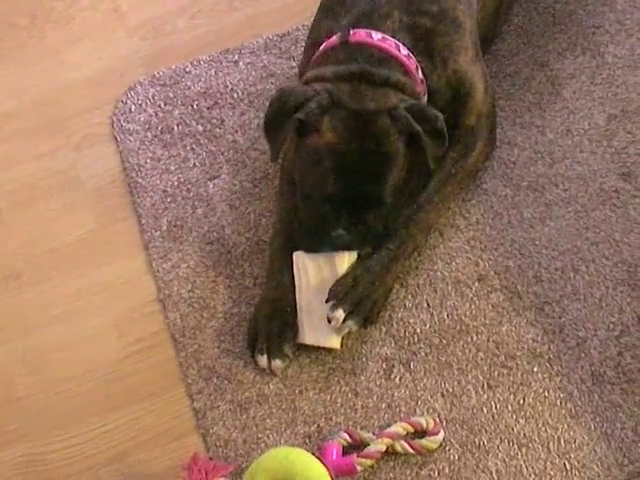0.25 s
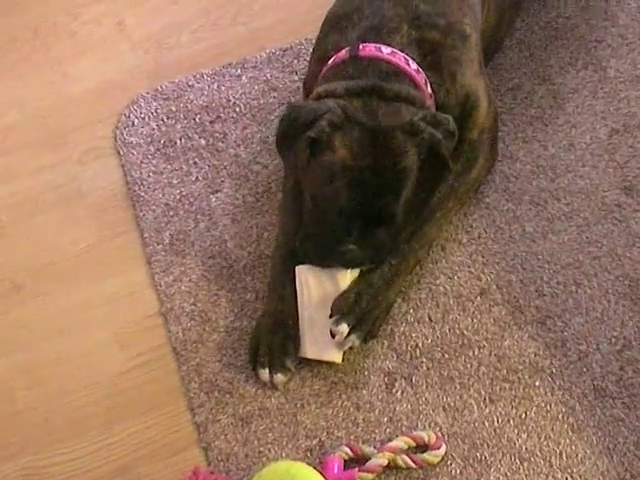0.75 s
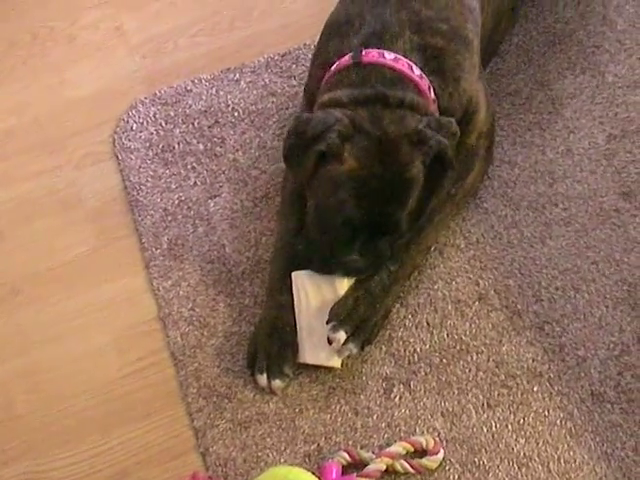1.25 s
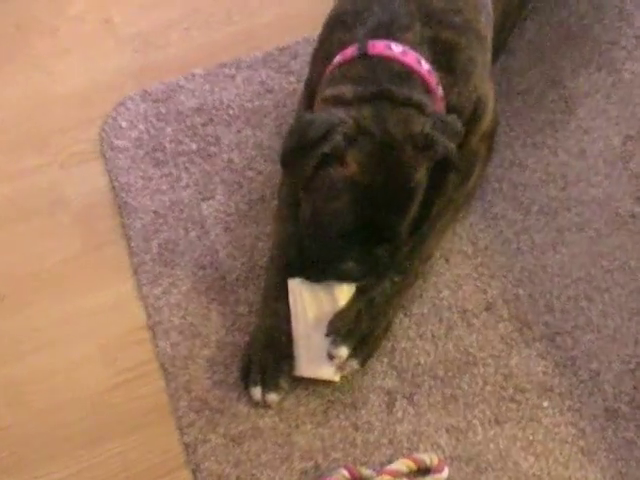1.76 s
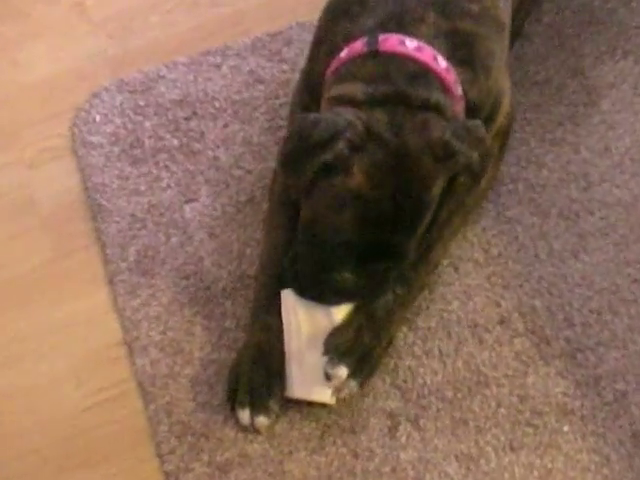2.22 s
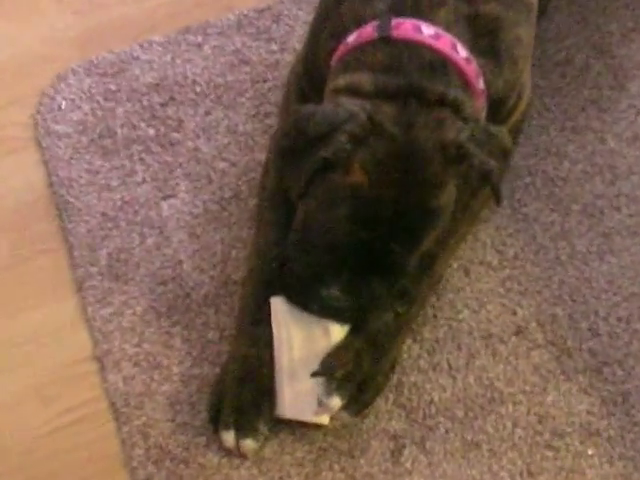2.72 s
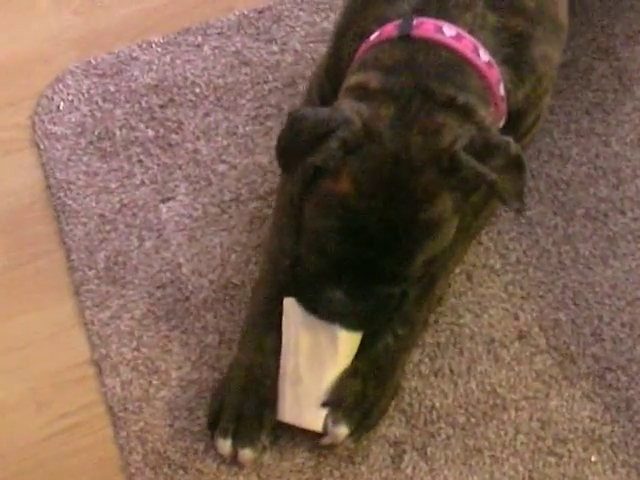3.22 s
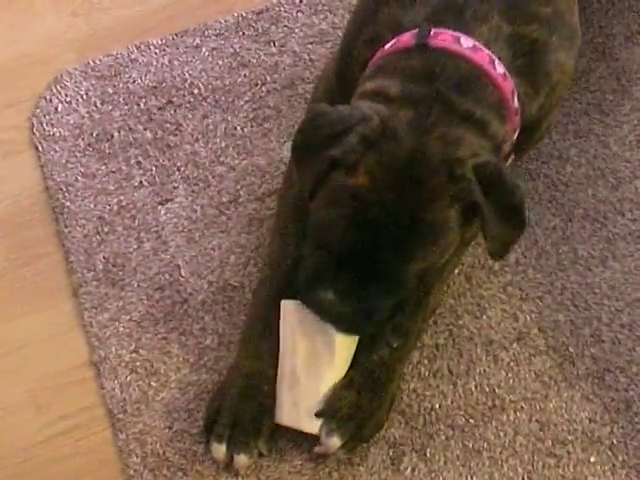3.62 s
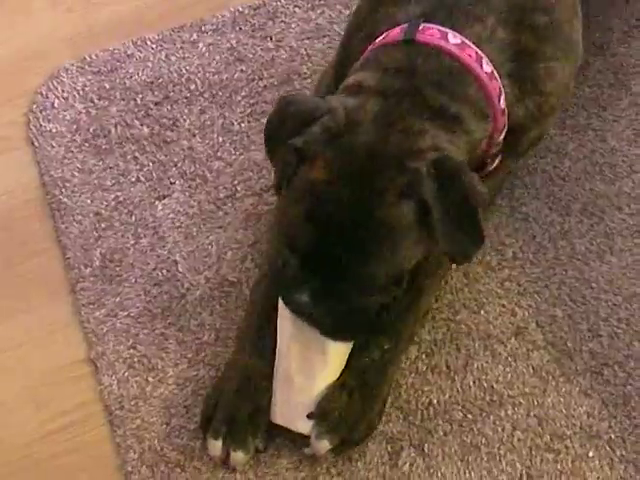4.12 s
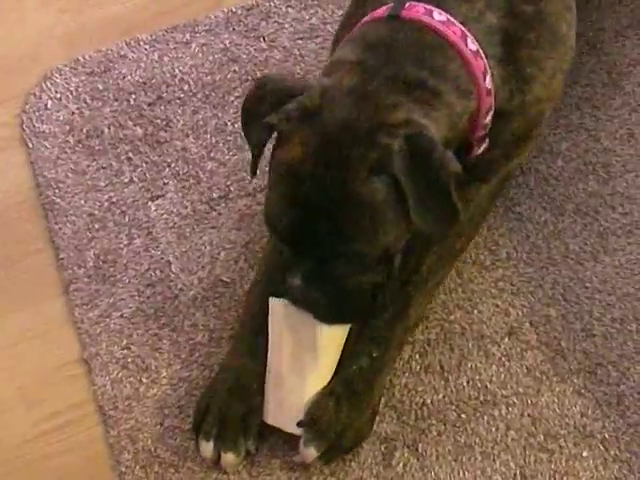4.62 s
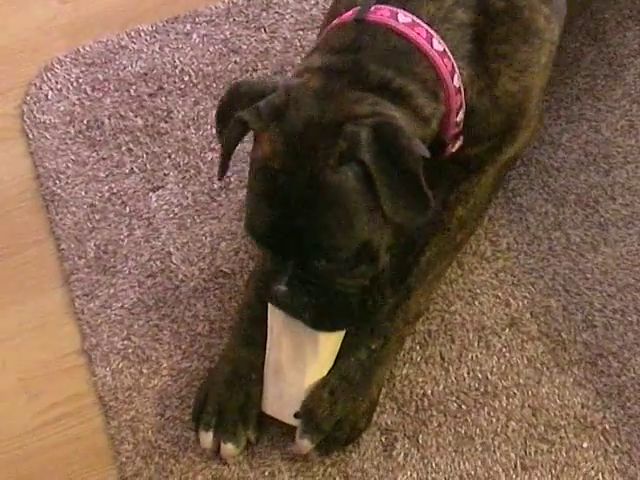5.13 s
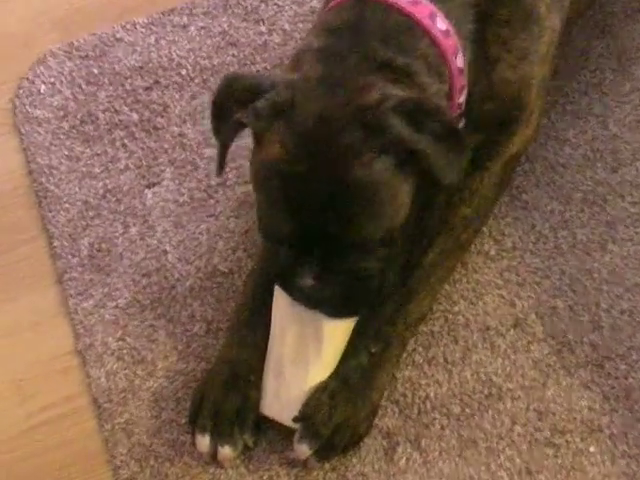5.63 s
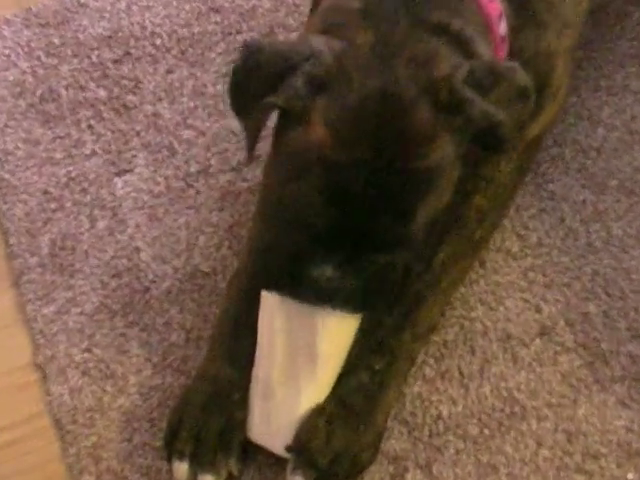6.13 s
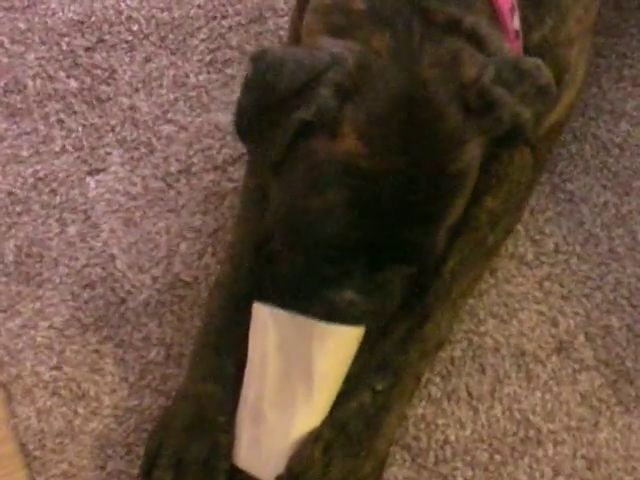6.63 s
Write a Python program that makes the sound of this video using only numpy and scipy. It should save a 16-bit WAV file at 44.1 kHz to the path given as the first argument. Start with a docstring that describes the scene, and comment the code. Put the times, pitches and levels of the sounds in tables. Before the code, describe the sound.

Indoors, teeth click and crack sharply on a hard chew with wet rasping and soft thumps, above steady low room rumble and hum.

```python
"""Dog gnawing a hollow chew

In a living room a dog lies on a rug with a hard chew held between its paws, before a small
hand-held stereo microphone. Bites and knocks ring modes of chew and teeth; thuds are beating
low tones from the floor; the tongue is flickering noise bands. Dense reflections and crackling
noise tails place the blows in the room; an appliance hums over coloured noise and rumble."""
import sys
import numpy as np
from scipy import signal
from scipy.fft import rfft, irfft
from scipy.io import wavfile
from scipy.ndimage import uniform_filter1d

SR = 44100
rng = np.random.default_rng(int(sys.argv[2]) if len(sys.argv) > 2 else 0)


def to_wav(sig):
    """Store sig (one row per channel, or 1-D mono) as 16-bit WAV at the path in sys.argv[1].

    Samples outside -1..1 are clipped; the rate is SR.
    """
    pcm = np.clip(np.atleast_2d(sig), -1, 1) * 32767
    pcm = np.round(pcm).astype(np.int16)
    wavfile.write(sys.argv[1], SR, pcm.T)  # frames by channels


def volts_from_decibels(level):
    """Turn decibel levels (scalar or array-like) into linear amplitude factors."""
    exponent = np.asarray(level, float) / 20
    return 10 ** exponent


N = 302526

# room tone spectrum: (frequency [Hz], relative density [dB per Hz])
ROOM_TONE_COLOUR = [(15, -53), (25, -43), (48, -22.5), (86, -5), (146, -4.5), (194, 2), (284, 0),
                    (360, -22), (415, -13), (527, -17.5), (789, -14.5), (1240, -18), (5560, -28),
                    (6730, -31), (7400, -36.5), (9620, -71), (16300, -120)]
# appliance lines: (frequency [Hz], mean level [dB rms], frequency wander [Hz])
HUM_LINES = [(99, -57.5, 0.55), (192, -78, 8.5), (292.3, -65.5, 8.6), (410.3, -67, 4.32)]
# likeness of the two microphone sides in noise: (frequency [Hz], likeness [-1 to 1])
MICROPHONE_LIKENESS = [(60, 0.19), (180, 0.12), (530, -0.18), (1580, -0.49), (4710, -0.56), (14000, -0.15)]
# reflections of the living room: (frequency [Hz], t60 [s], relative level [dB])
ROOM_DECAY = [(147, 0.35, 3), (485, 0.47, 5), (830, 0.41, -1.5), (1480, 0.28, 2), (3000, 0.15, -2.5),
              (5930, 0.64, -13.5), (11000, 0.2, -3)]
# crackling noise tails of the cracks, dying away in the room:
# (time [s], level at the crack [dB], centre [Hz], width [Hz], t60 [s])
CRACK_TAILS = [(1.353, -58, 2500, 1500, .2), (1.6437, -51, 3280, 1500, .12), (1.952, -61, 5300, 2000, 0.14),
               (2.41, -48, 3000, 600, 0.44), (2.409, -51, 5000, 700, 0.36),
               (2.5754, -47.5, 3000, 1610, 0.26), (2.8543, -48.5, 3050, 400, 0.69),
               (2.853, -53, 4570, 2510, 0.39), (3.3291, -55, 3450, 400, .3),
               (3.6821, -46.5, 3000, 900, 0.41), (3.682, -40.5, 5170, 1990, 0.33),
               (3.8645, -30, 3010, 650, 0.45), (3.8656, -40.5, 5300, 2200, 0.23),
               (3.8663, -35.5, 1380, 297, 0.36), (4.0761, -45, 3000, 1510, 0.44),
               (4.362, -56, 2730, 900, .4), (4.4394, -51, 3140, 900, 0.24),
               (4.6957, -48.5, 3300, 1200, 0.34), (4.936, -41, 3310, 350, 0.4),
               (4.936, -41, 5370, 900, 0.33), (4.936, -47, 3970, 600, 0.33), (5.3938, -46, 3460, 503, 0.43),
               (5.395, -42, 5400, 1600, 0.33), (5.3935, -47, 2000, 1200, 0.32),
               (4.522, -51, 2600, 1600, 0.18), (4.938, -47, 2000, 1400, 0.36)]
# treble hiss spectrum: (frequency [Hz], relative density [dB per Hz])
HISS_COLOUR = [(8300, -10), (8800, -1.5), (10000, 3), (12000, -3.5), (13200, -10.5), (14000, -40)]
# steady treble hiss before flicker: (time [s], level [dB])
STEADY_HISS = [(0.25, -70), (0.45, -89.5), (1.08, -70), (1.48, -79.5), (1.62, -65), (2.1, -70.5),
               (2.38, -78), (2.55, -75), (3.1, -72.5), (3.4, -65.5), (4.15, -70.5), (4.8, -71.5),
               (5.6, -67), (5.93, -68), (6.25, -66.5), (6.86, -70)]
# short puffs of treble hiss, perhaps licks: (time [s], peak [dB], slope to either side [dB/s])
HISS_PUFFS = [(0.07, -64, 158), (0.381, -69.5, 195), (0.554, -60.5, 292), (0.709, -65, 448),
              (0.78, -88, 301), (0.88, -78, 500), (1.3, -75, 250), (1.73, -67, 300), (2.23, -53, 800),
              (2.33, -73, 400), (2.59, -62.5, 400), (2.73, -70.5, 204), (2.98, -62, 248), (4.3, -59, 340),
              (4.53, -65, 254), (4.7, -62, 250), (4.87, -64, 404), (4.99, -63, 300), (6.31, -60, 150),
              (6.57, -61.5, 250), (6.67, -61, 196)]
# steady wet rasp before flicker: (time [s], level [dB], centre [Hz], reach [octaves])
TONGUE_RASP = [(0.1, -55.5, 3400, 0.71), (0.45, -75, 2800, .4), (0.54, -63.5, 4000, 0.69),
               (0.75, -65, 2940, 0.31), (1.08, -56.5, 3270, 0.87), (1.45, -67.5, 2820, 0.41),
               (1.87, -57.5, 3650, 0.98), (2.15, -63.5, 3200, 0.93), (2.6, -66, 3200, 0.5),
               (3.02, -55, 2740, 1.0), (3.25, -57.5, 3180, 1), (3.58, -57, 3080, 1), (3.8, -58, 3000, 0.98),
               (4.13, -53.5, 2850, 0.62), (4.33, -61, 2930, 1), (4.52, -52.5, 2640, 1),
               (4.58, -59.5, 2770, 0.8), (5.27, -59.5, 3360, 1), (5.6, -59.5, 3320, 0.57),
               (5.88, -58, 3000, 0.95), (6.0, -54.5, 3620, 0.55), (6.12, -58.5, 3550, 0.52),
               (6.2, -54.5, 3400, 0.99), (6.3, -56.5, 3700, 1), (6.35, -51, 3740, 0.29),
               (6.45, -56.5, 4100, 0.37), (6.58, -59.5, 3000, 0.93), (6.86, -56.5, 3250, 1)]
# chew pushed against the floor: (time [s], relative level [dB], lower pitch [Hz], t60 [s])
FLOOR_THUDS = [(0.032, -41, 235, 0.029), (0.253, -41.5, 183, 0.12), (0.677, -35, 175, 0.049),
               (0.736, -38.5, 173, 0.19), (0.795, -39, 170, 0.055), (0.875, -41, 157, 0.055),
               (1.252, -38.5, 164.3, 0.29), (1.354, -26.5, 172, 0.046), (1.408, -37.5, 193, 0.063),
               (1.385, -37, 173, 0.035), (1.462, -35.5, 187, 0.04), (1.485, -41.5, 197, 0.1),
               (1.952, -34.5, 183, 0.043), (2.087, -39.5, 212, 0.046), (2.219, -43, 218, 0.061),
               (2.236, -26.5, 188, 0.04), (2.376, -33.5, 174, 0.095), (2.489, -33, 186, 0.035),
               (2.576, -36.5, 175, 0.067), (2.597, -27.5, 176.5, 0.095), (2.791, -26, 188, 0.035),
               (2.813, -30.5, 178, 0.15), (2.852, -23.5, 168.3, 0.28), (3.089, -39, 175, 0.15),
               (3.15, -26.5, 167, 0.099), (3.212, -37.5, 214, 0.13), (3.303, -34.5, 162, 0.033),
               (3.683, -22.5, 242, 0.04), (3.708, -25, 173, 0.044), (3.74, -24, 192, 0.052),
               (3.773, -39, 266, 0.11), (3.793, -30.5, 176, 0.046), (3.869, -26.5, 177, 0.058),
               (3.901, -27.5, 238, 0.064), (4.082, -26.5, 173, 0.11), (4.326, -33, 196, 0.036),
               (4.37, -34, 199, 0.062), (4.39, -37, 200, 0.045), (4.418, -30.5, 184, 0.049),
               (4.445, -25, 192, 0.052), (4.472, -35.5, 202, 0.085), (4.505, -33, 179, 0.06),
               (4.535, -37, 199, 0.087), (4.689, -38.5, 158, 0.029), (4.751, -25, 185, 0.045),
               (4.869, -47, 210, 0.066), (4.938, -27, 195, 0.042), (4.956, -37, 171, 0.06),
               (4.98, -26.5, 179, 0.09), (5.25, -41, 245, 0.019), (5.376, -30.5, 226, 0.091),
               (5.395, -24, 216.7, 0.05), (5.429, -28.5, 192, 0.036), (5.453, -32, 222, 0.093),
               (5.61, -40, 181, 0.074), (5.915, -30.5, 192, 0.026), (5.947, -34, 192, 0.098),
               (6.041, -45, 192, 0.13), (6.08, -39, 200, 0.061), (6.316, -35, 188, 0.019),
               (6.469, -45, 284, 0.096), (6.566, -46, 266, 0.13)]
# jaws knocking the hollow of the chew; the grip picks the modes:
# (time [s], relative level [dB], centre [Hz], reach [octaves], left over right [dB])
JAW_KNOCKS = [(0.1, -45, 805, 0.24, -1), (0.674, -47, 780, 0.26, 1), (0.872, -44.5, 930, 0.28, -1),
              (0.958, -40.5, 925, 0.19, -2), (0.98, -39, 880, 0.24, -2), (1.079, -46, 980, 0.24, -2),
              (1.251, -50, 750, 0.26, -2), (1.351, -45.5, 676, 0.65, -1), (1.388, -48, 960, 0.24, -4),
              (1.408, -47, 890, 0.3, -9), (1.432, -57, 890, 0.31, -2), (1.468, -59, 835, 0.18, -2),
              (1.605, -45, 830, 0.3, -17), (1.695, -54, 770, 0.15, -5), (1.954, -33.5, 810, 0.15, -3),
              (2.057, -44.5, 716, 0.31, -12), (2.23, -43, 1030, 0.3, -2), (2.31, -45, 1010, 0.16, -7),
              (2.408, -42.5, 795, 0.14, -9), (2.488, -45.5, 750, 0.33, -7), (2.565, -39, 705, 0.45, -2),
              (2.596, -32.5, 690, 0.31, -1), (2.657, -54, 744, 0.32, -2), (2.788, -30.5, 700, 0.46, -1),
              (2.851, -20.5, 403, 0.73, -1.5), (2.878, -40, 555, 0.95, -1), (2.912, -48, 704, 0.8, -4),
              (2.972, -46, 657, 0.6, -2), (3.077, -50, 1200, 0.28, -8), (3.087, -40, 704, 0.46, 1),
              (3.138, -34.5, 590, 0.57, -2), (3.152, -33, 610, 0.55, -1), (3.222, -48, 662, 0.43, 1),
              (3.581, -49, 860, 0.17, -24), (3.648, -49, 840, 0.44, -8), (3.681, -30, 590, 0.63, -2),
              (3.704, -29.5, 624, 0.26, -8), (3.738, -44.5, 800, 0.38, -16), (3.758, -37, 670, 0.16, -20),
              (3.865, -16, 553, 0.78, -1.5), (3.886, -33, 650, 0.62, 2), (3.906, -46, 600, 0.46, 7),
              (3.927, -28.5, 770, 0.12, -8), (4.075, -28.5, 770, 0.43, -4), (3.958, -45, 1000, 0.35, -14),
              (4.28, -46, 865, 0.19, -18), (4.331, -43, 640, 0.42, -8), (4.361, -24.5, 542, 0.41, -1),
              (4.477, -44, 620, 0.94, -1), (4.695, -36.5, 1834, 0.091, -1), (4.751, -48, 820, 0.2, 1),
              (4.936, -33.5, 700, 0.69, 1), (4.96, -36, 620, 0.34, -6), (5.152, -46.5, 826, 0.42, -15),
              (5.242, -50, 880, 0.33, -20), (5.378, -36, 603, 0.42, -1), (5.393, -47, 1400, 0.52, -1),
              (5.397, -28.5, 594, 0.56, -3), (5.456, -42.5, 745, 0.17, -16), (5.535, -49, 630, 0.21, -11),
              (5.625, -53, 1600, 1, -11), (5.701, -47.5, 755, 0.13, -15), (5.901, -46, 493, 0.59, -12),
              (5.925, -35.5, 490, 0.18, 0), (5.965, -35, 485, 0.29, -6), (6.101, -49.5, 870, 0.12, -19),
              (6.502, -40, 470, 0.43, -5), (6.778, -43.5, 1220, 0.16, -2), (6.843, -44.5, 830, 0.48, -14)]
# modes of the chew's hollow: (frequency [Hz], relative level [dB], t60 [s])
HOLLOW_MODES = [(316, 1.5, 0.043), (480.4, 0, 0.057), (662, -2, 0.12), (732, -1.5, 0.043),
                (790.5, 10, 0.028), (885, 4.5, 0.029), (967, 4.5, 0.037), (1208, 15, 0.0074),
                (1402, 16.5, 0.015), (1680, 22.5, 0.0046)]
# teeth cracking on the chew's wall, levels relative to the modes:
# (time [s], wall level [dB], wall pitch [Hz], tooth tick level [dB], sizzle level [dB])
TOOTH_BITES = [(0.0603, -44, 4400, -61, -61), (0.4195, -39.5, 2830, -72, -59.5),
               (0.6862, -56, 1960, -46, -54), (0.8718, -34.5, 3230, -55, -68),
               (1.0095, -42.5, 2770, -55, -78), (1.052, -48, 3530, -45, -59), (1.3541, -53, 2300, -54, -68),
               (1.433, -61, 1980, -62, -80), (1.6007, -41, 2780, -53, -78), (1.616, -39, 3130, -60, -80),
               (1.6444, -28, 3240, -46, -50), (1.952, -41, 3900, -38, -43.5), (2.0586, -60, 2380, -47, -83),
               (2.2302, -35, 3170, -46, -46.5), (2.41, -30, 2930, -33.5, -37), (2.488, -44, 3000, -52, -73),
               (2.5747, -43, 3200, -43, -66), (2.595, -56.5, 2400, -39, -60), (2.755, -52, 4200, -60, -80),
               (2.788, -46, 3280, -61, -82), (2.807, -51, 4100, -62, -80), (2.8523, -25, 3150, -37, -51),
               (2.865, -29, 3100, -57, -70), (2.9975, -37.5, 2800, -41, -51),
               (3.0873, -48, 2730, -65, -87.5), (3.1467, -38.5, 2830, -71, -90),
               (3.2242, -40.5, 2900, -50.5, -83), (3.3288, -41, 3350, -52, -53),
               (3.6823, -25, 2950, -24, -35.5), (3.7136, -31, 3200, -54, -53), (3.754, -40, 2870, -51, -53),
               (3.8651, -5, 3000, -27, -32.5), (3.955, -40, 3000, -65, -68), (4.076, -29, 2850, -45, -44.5),
               (4.2872, -40, 3160, -51.5, -48), (4.3244, -44, 2740, -70, -67),
               (4.362, -27.5, 3060, -50, -49.5), (4.441, -29.5, 3200, -55, -67),
               (4.418, -44, 3300, -58, -73), (4.523, -44, 2730, -50, -61),
               (4.6957, -32.5, 3330, -49, -50.5), (4.937, -19.5, 3220, -26.5, -43.5),
               (4.952, -43, 3340, -43, -48), (4.9775, -28, 3160, -54, -45), (5.374, -45, 2730, -62, -72),
               (5.386, -42, 2680, -56, -66), (5.3937, -24.5, 3280, -25.5, -31.5),
               (5.441, -41, 3270, -60, -75), (5.454, -42, 3500, -62, -75), (5.583, -49, 2830, -67, -80),
               (5.6265, -37.5, 2900, -48.5, -80), (5.8715, -53, 2020, -52, -71),
               (5.912, -36.5, 2900, -46, -85), (5.983, -42, 3000, -59, -83), (6.158, -38, 3030, -61, -75),
               (6.171, -47, 4270, -53, -63), (6.285, -44, 3600, -59, -75), (6.3131, -49, 2420, -53, -51),
               (6.3315, -42, 3700, -63, -55), (6.6595, -34, 3220, -45.5, -59),
               (6.725, -41.5, 3420, -53, -66), (6.818, -35.5, 3250, -66, -64)]
# modes of the chew's wall: (frequency [Hz], relative level [dB], t60 [s])
WALL_MODES = [(1820, -18, 0.008), (2260, 27, 0.0014), (2506, 1.5, 0.019), (2897, 10, 0.0032),
              (3132, 4, 0.0069), (3439, 8, 0.0063), (3700, 4.5, 0.0076), (3950, 1, 0.018)]
# modes of the tooth tick: (frequency [Hz], relative level [dB], t60 [s])
TICK_MODES = [(5010, -17.5, 0.046), (5400, 2, 0.0045), (5757, -4, 0.0051), (6810, -17.5, 0.018)]
# modes of the tooth sizzle: (frequency [Hz], relative level [dB], t60 [s])
SIZZLE_MODES = [(9100, 2.5, 0.0028), (9760, -8.5, 0.011), (10900, 7, 0.0023), (11960, -5.5, 0.0014)]
# level under which faint treble drops out: (frequency [Hz], threshold [dB per Hz])
TREBLE_THRESHOLD = [(5500, -130), (6500, -108), (7200, -103), (7800, -104), (9000, -107), (11000, -107),
                    (13500, -106)]


def rms_one(x):
    """Scale to rms 1."""
    return x / np.sqrt(np.mean(x ** 2) + 1e-20)


def at_hz(points, hz, column=1):
    """Read a table on a log-frequency axis."""
    return np.interp(np.log(hz), np.log(np.array(points)[:, 0]), np.array(points)[:, column])


def drift(rate):
    """Slow chance with spread 1: noise through a low-pass at rate [Hz], drawn every 40 samples."""
    r = np.exp(-80 * np.pi * rate / SR)
    white = rng.standard_normal(N // 40 + 2002)
    slow = signal.lfilter([1], [1, -2 * r, r * r], white)[2000:]
    return np.interp(np.arange(N) / 40, np.arange(len(slow)), rms_one(slow))


def bandpass(x, low, high):
    """Keep the band between two frequencies [Hz]."""
    return signal.sosfilt(signal.butter(2, [low, high], "band", fs=SR, output="sos"), x)


def pair(mid, side, alike):
    """Left and right from two independent signals, alike from -1 to 1."""
    common, opposed = np.sqrt(1 + alike) * mid, np.sqrt(1 - alike) * side
    return np.array([common + opposed, common - opposed]) / np.sqrt(2)


def coloured_noise(spectrum):
    """Stereo noise with the given spectrum and the likeness of the microphone sides; rms 1."""
    hz = np.maximum(np.fft.rfftfreq(N, 1 / SR), 1)
    inside = (hz > spectrum[0][0]) & (hz < spectrum[-1][0])
    mid, side = rfft(rng.standard_normal((2, N))) * volts_from_decibels(at_hz(spectrum, hz)) * inside
    return rms_one(irfft(pair(mid, side, at_hz(MICROPHONE_LIKENESS, hz)), N))


def scattered(count, mean, spread):
    """Rows (time [s], values..) at random moments, values drawn about their means."""
    s = rng.random(count) * (N - 1) / SR
    return np.column_stack([s, mean + np.array(spread) * rng.standard_normal((count, len(mean)))])


def peaks(s, peak_db, rise_db_per_s, fall_db_per_s):
    """Power of pointed swells, on a millisecond grid."""
    late = np.arange(0, N / SR + .002, .001)[:, None] - s
    drop_db = np.where(late < 0, -late * rise_db_per_s, late * fall_db_per_s)
    power = volts_from_decibels(2 * (peak_db - drop_db)).sum(axis=1)
    return np.interp(np.arange(N) / SR * 1000, np.arange(len(power)), power)


def ring(clicks, hz, t60):
    """A two-pole resonator: a unit click sets a decaying sine of starting height 1 ringing."""
    r, w = volts_from_decibels(-60 / (t60 * SR)), 2 * np.pi * hz / SR
    return signal.lfilter([0, np.sin(w)], [1, -2 * r * np.cos(w), r * r], clicks + 1e-18)


def strike(modes, s, level_db, pan_db, spread_db, contact_s, centre_hz=None, reach=None):
    """Each blow rings every mode with a strength and direction of its own, most near the centre."""
    aim_spread_db = 4
    at, out = np.round(s * SR).astype(int), np.zeros((2, N))
    chance = rng.standard_normal((len(s), 2, len(modes)))
    contact = np.hanning(round(contact_s * SR))
    for k, (hz, mode_db, t60) in enumerate(modes):
        near = 1 if centre_hz is None else np.exp(-.5 * (np.log2(hz / centre_hz) / reach) ** 2)
        strength = near * volts_from_decibels(level_db + mode_db + spread_db * chance[:, 0, k])
        direction_db = pan_db + aim_spread_db * chance[:, 1, k]
        clicks = np.zeros((2, N))
        clicks[:, at] = strength * volts_from_decibels(np.outer([.5, -.5], direction_db))
        # the contact lasts a moment, so the mode swells up before it dies
        push = 2 * contact / contact.sum() * np.cos(2 * np.pi * hz * np.arange(len(contact)) / SR)
        out += ring(signal.lfilter(push, [1], clicks), hz, t60)
    return out


def room_tone():
    """Coloured noise: steady hiss above; below, a rumble that comes in lumps."""
    level_db, sway_db = -46.5, 1.0
    lump_db, lump_top_hz = 2.5, 340
    tone = volts_from_decibels(level_db + sway_db * drift(1.0)) * coloured_noise(ROOM_TONE_COLOUR)
    low = signal.sosfiltfilt(signal.butter(2, lump_top_hz, fs=SR, output="sos"), tone)
    lumps = rms_one(volts_from_decibels(lump_db * (drift(2.4) + drift(11.0))))
    return tone + (lumps - 1) * low


def handling():
    """Lumpy low noise from the hand that holds the microphone, different on each side."""
    side_db = np.array([[-72.0], [-77.0]])   # left, right
    sway_db = 5.0
    rumble = rms_one(bandpass(rng.standard_normal((2, N)), 25, 70))
    return volts_from_decibels(side_db + sway_db * drift(3.9)) * rumble


def hum():
    """Mains-driven motor lines: sines that waver in level and pitch, half a radian apart by side."""
    t, out = np.arange(N) / SR, 0
    for hz, level_db, wander_hz in HUM_LINES:
        phase = 2 * np.pi * np.cumsum(hz + wander_hz * drift(5.9)) / SR
        out = out + volts_from_decibels(level_db + 1.86 * drift(8.8)) * np.sqrt(2) * np.sin(phase + [[0.], [.5]])
    return out


def living_room(x):
    """Dense reflections: octave bands of noise, each dying at its own rate, after a short gap."""
    first_echo_s = 0.005
    t, tail = np.arange(SR // 2) / SR, 0
    edges = 110 * 2. ** np.arange(8.)
    for low, high in zip(edges, edges[1:]):
        hz = np.sqrt(low * high)
        band = bandpass(rng.standard_normal((2, len(t))), low, high)
        band = band * volts_from_decibels(-60 * t / at_hz(ROOM_DECAY, hz))
        share = np.sqrt((high - low) / (SR / 2) / np.mean(np.sum(band ** 2, axis=1)))
        tail = tail + volts_from_decibels(at_hz(ROOM_DECAY, hz, column=2)) * share * band
    tail = pair(*tail, 1)   # the same on both sides
    tail = tail * np.clip(t / first_echo_s - 1, 0, 1)   # reflections thicken after the gap
    return signal.fftconvolve(x[None], tail, axes=1)[:, :N]


def crack_tails():
    """Dense random clicks through one band: a short faint noise, a jump, then dying away in the room."""
    lead_db, lead_s = -11.5, 0.022   # faint noise ahead of each jump: level below it, and length
    clicks_per_s, click_spread_db, likeness = 3000, 3.0, 0.4
    out, lead = np.zeros((2, N + SR)), round(lead_s * SR)
    t = np.arange(-lead, SR // 2) / SR
    for s, level_db, hz, width_hz, t60 in CRACK_TAILS:
        chance, sign, size = rng.random((3, 2, len(t)))
        heights = np.sign(sign - .5) * volts_from_decibels(-click_spread_db * np.log(size + .01))
        clicks = (chance < clicks_per_s / SR) * heights
        band = bandpass(clicks, hz - width_hz / 2, hz + width_hz / 2)
        crackle = rms_one(pair(*band, likeness))
        i = round(s * SR) - lead
        out[:, i:i + len(t)] += volts_from_decibels(level_db + np.where(t < 0, lead_db, -60 * t / t60)) * crackle
    return out[:, :N]


def treble_hiss():
    """Flickering treble noise: a steady bed, short puffs, and a spray around each listed sizzle."""
    spray_db, spray_rise_db_per_s, spray_fall_db_per_s = -17, 602, 286   # level is below the sizzle
    bed = volts_from_decibels(2 * np.interp(np.arange(N) / SR, *np.transpose(STEADY_HISS)))
    puff_s, puff_db, slope = np.transpose(HISS_PUFFS)
    puffs = peaks(puff_s, puff_db, slope, slope)
    bite_s, *_, sizzle_db = np.transpose(TOOTH_BITES)
    spray = peaks(bite_s, sizzle_db + spray_db, spray_rise_db_per_s, spray_fall_db_per_s)
    flicker = volts_from_decibels(3.0 * drift(12.8) + 0.94 * drift(25.0))
    return np.sqrt(bed + puffs + spray) * flicker * coloured_noise(HISS_COLOUR)


def tongue():
    """Wet rubbing: fifth-octave noise bands around a moving centre, flickering in grains."""
    flicker_db, grit_db = 3.0, 0.5
    t = np.arange(N) / SR
    s, rasp_db, centre_hz, reach = np.transpose(TONGUE_RASP)
    steady, centre = volts_from_decibels(2 * np.interp(t, s, rasp_db)), np.interp(t, s, centre_hz)
    reach = np.interp(t, s, reach)
    grit = volts_from_decibels(grit_db * drift(170.0))   # all bands catch and slip together
    white, rasp = rng.standard_normal((2, 2, N)), 0
    edges = 1200 * 2 ** (np.arange(14) / 5)
    for k, (low, high) in enumerate(zip(edges, edges[1:])):
        band = rms_one(bandpass(white[k % 2], low, high))   # neighbouring bands stay independent
        octaves_off = np.log2(np.sqrt(low * high) / centre)
        share = np.exp(-(octaves_off / reach) ** 2) / (5 * np.sqrt(np.pi) * reach)
        rasp = rasp + np.sqrt(steady * share) * volts_from_decibels(flicker_db * drift(25)) * grit * band
    return rasp


def thuds():
    """Floor boards answer each push with two low modes that beat and take a moment to swell."""
    swell_cycles, upper_ratio, upper_db = 0.6, 1.45, -12.0
    out, t = np.zeros(N + SR), np.arange(SR // 3) / SR
    for s, level_db, hz, t60 in FLOOR_THUDS:
        swell = (1 - np.exp(-t * hz / swell_cycles)) ** 2
        shape = swell * volts_from_decibels(-60 * t / max(t60, .02))   # no decay shorter than 0.02 s
        upper = volts_from_decibels(upper_db) * np.sin(2 * np.pi * upper_ratio * hz * t)
        tones = np.sin(2 * np.pi * hz * t) + upper
        i = round(s * SR)
        out[i:i + len(t)] += volts_from_decibels(level_db) * shape / shape.max() * tones
    small = signal.butter(4, 90, "high", fs=SR, output="sos")   # too small to radiate deep bass
    return signal.sosfilt(small, out[:N])


def knocks():
    """Softer, longer contacts, and faint random taps, that sound the hollow of the chew."""
    # level [dB], centre [Hz], reach [octaves], left over right [dB]
    taps = scattered(16, mean=(-55, 767, 1, 6), spread=(0.52, 17, 0.099, 1.7))
    s, level_db, centre_hz, reach, pan_db = np.vstack([JAW_KNOCKS, taps]).T
    return strike(HOLLOW_MODES, s, level_db - 4.5, pan_db, 2.5, 0.004, centre_hz, reach)


def bites():
    """Cracks and faint random nibbles ring the chew's wall and tick and sizzle in the teeth."""
    # wall level [dB], wall pitch [Hz], tick level [dB], sizzle level [dB]
    nibbles = scattered(8, mean=(-57.5, 2900, -45, -89), spread=(3, 940, 2.7, 4.7))
    s, wall_db, wall_hz, tick_db, sizzle_db = np.vstack([TOOTH_BITES, nibbles]).T
    pan_db = -0.7 + 2 * rng.standard_normal(len(s))   # left over right
    tooth_spread_db, wall_reach_octaves = 2.5, 0.18
    wall = strike(WALL_MODES, s, wall_db - 1.5, pan_db, 0.43, 0.0014, wall_hz, wall_reach_octaves)
    tick = strike(TICK_MODES, s, tick_db + 4.5, pan_db, tooth_spread_db, 0.00063)
    sizzle = strike(SIZZLE_MODES, s, sizzle_db + 4.5, pan_db, tooth_spread_db, 0.00036)
    return wall + tick + sizzle


def scene():
    """Chew and floor in the room, over tongue, hum and room tone."""
    knock_room_db, thud_room_db = -5.0, -8.0   # how much of each reaches the reflections
    background = room_tone() + handling() + hum()
    rubbing = treble_hiss() + tongue()
    floor, jaws, teeth = thuds(), knocks(), bites()
    sent = (teeth + volts_from_decibels(knock_room_db) * jaws).mean(axis=0) + volts_from_decibels(thud_room_db) * floor
    room = living_room(sent) + crack_tails()
    return background + room + rubbing + floor + jaws + teeth


def treble_gate(x):
    """Faint treble drops out: a narrow band is muted while it stays under its threshold."""
    width_hz = 110
    hz, _, z = signal.stft(x, SR, "cosine", 2048, 1024)
    power = np.abs(z) ** 2 * 2 / hz[1]
    smooth = uniform_filter1d(power, round(width_hz / hz[1]), axis=1)
    level_db = 10 * np.log10(smooth + 1e-20)
    passes = level_db > at_hz(TREBLE_THRESHOLD, np.maximum(hz, 1))[:, None]
    return signal.istft(z * passes, SR, "cosine", 2048, 1024)[1][:, :N]


def low_pass(x):
    """Removes everything above the highest recorded frequency."""
    return signal.sosfilt(signal.butter(12, 14610, fs=SR, output="sos"), x)


def record(dry):
    """The microphone housing cancels a narrow band; a steep top and the treble gate follow."""
    notch_hz, notch_width_hz, top_hz = 8030, 240, 13700
    b, a = signal.iirnotch(notch_hz, notch_hz / notch_width_hz, fs=SR)
    notched = signal.lfilter(b, a, signal.lfilter(b, a, dry))   # twice, for a deeper notch
    cut = signal.sosfilt(signal.butter(10, top_hz, fs=SR, output="sos"), notched)
    return low_pass(treble_gate(cut))


dry = scene()
out = record(dry)
to_wav(out)
```